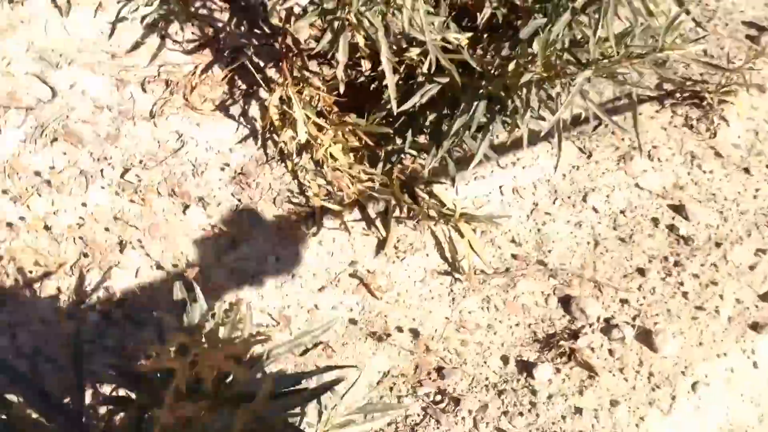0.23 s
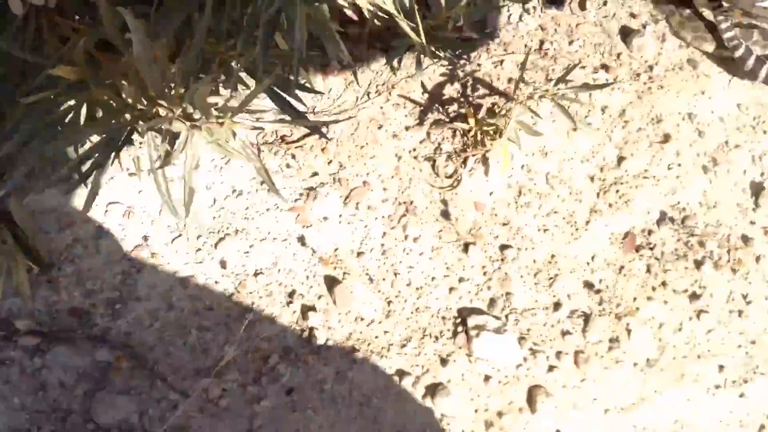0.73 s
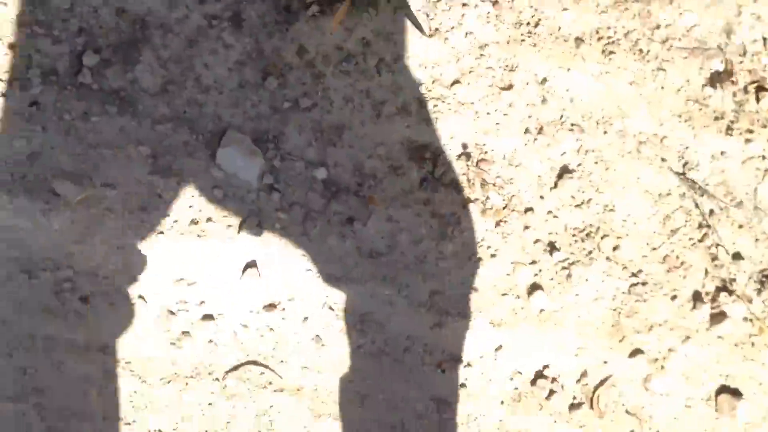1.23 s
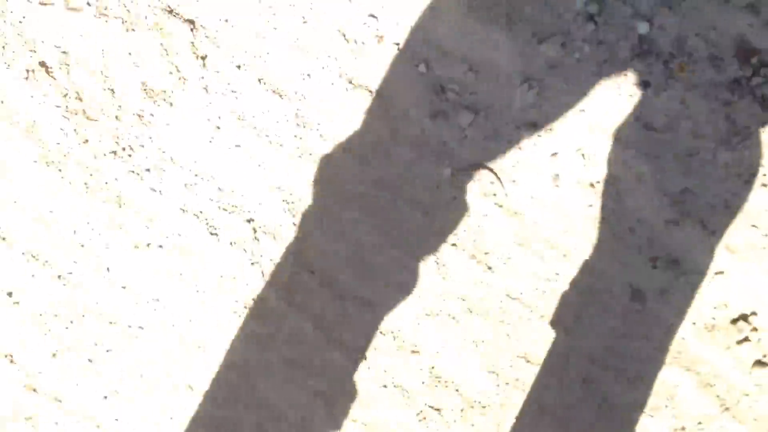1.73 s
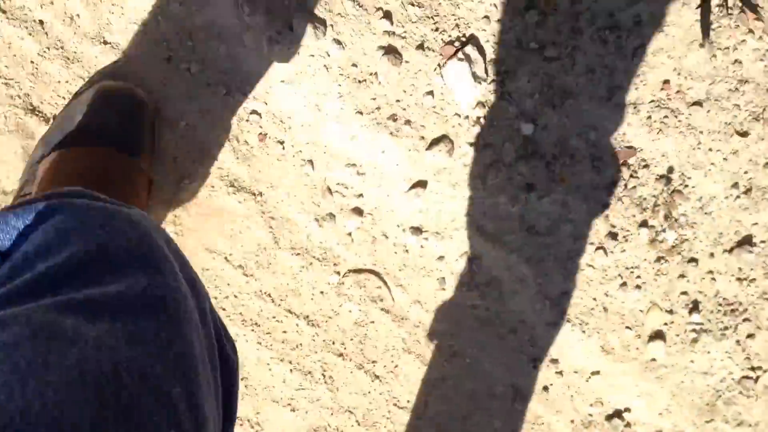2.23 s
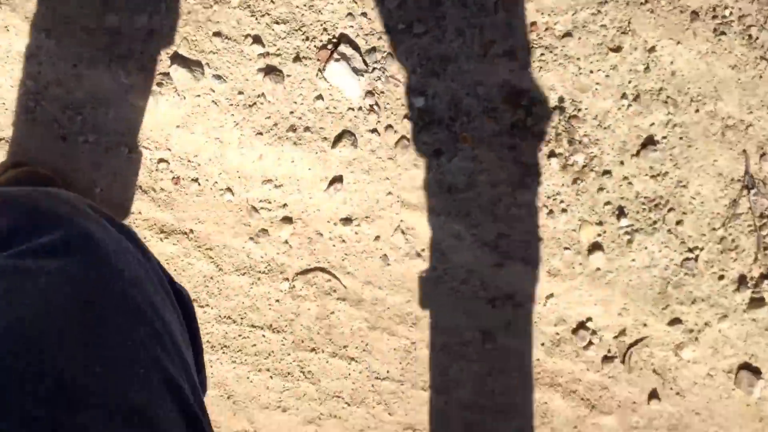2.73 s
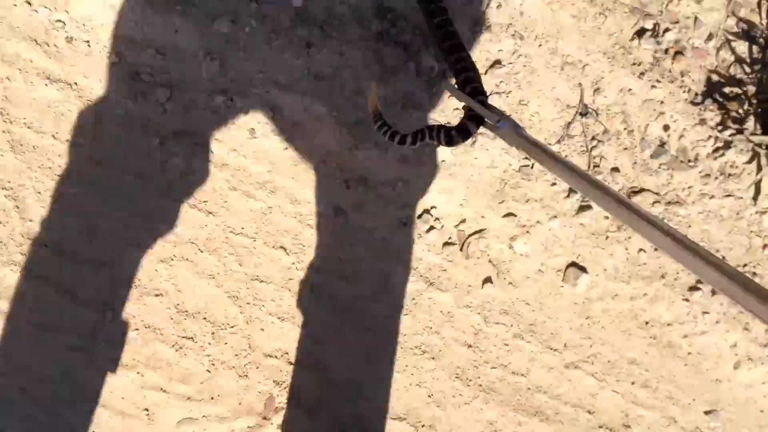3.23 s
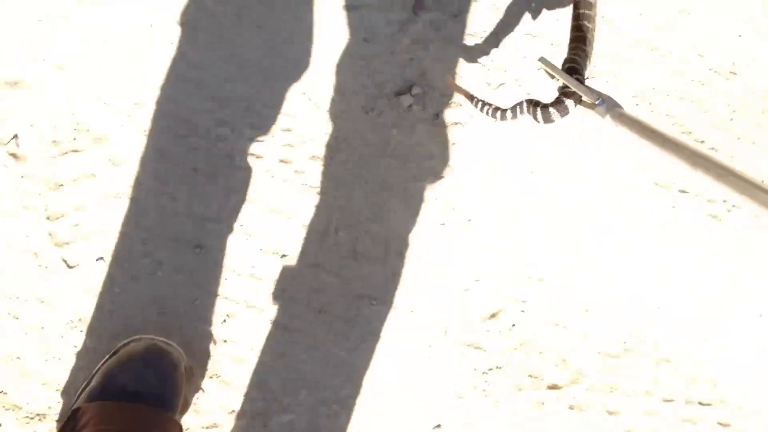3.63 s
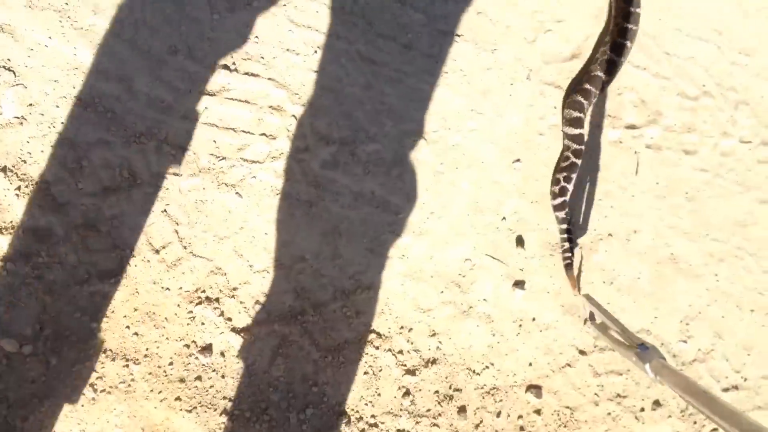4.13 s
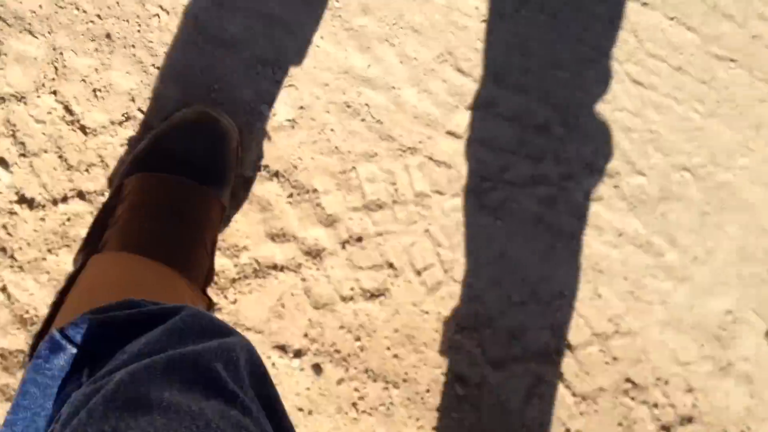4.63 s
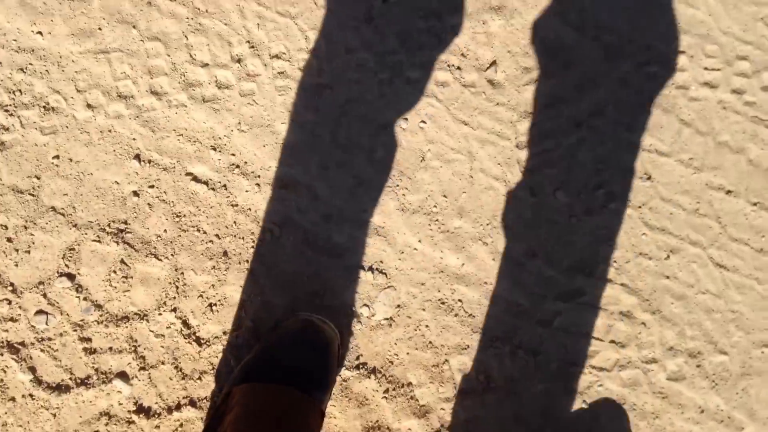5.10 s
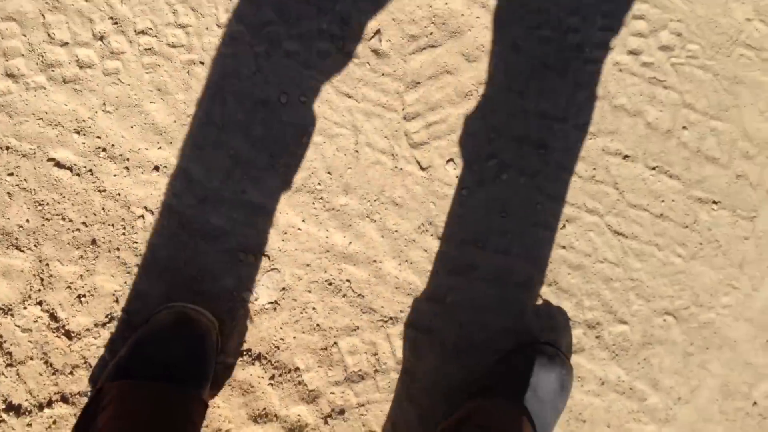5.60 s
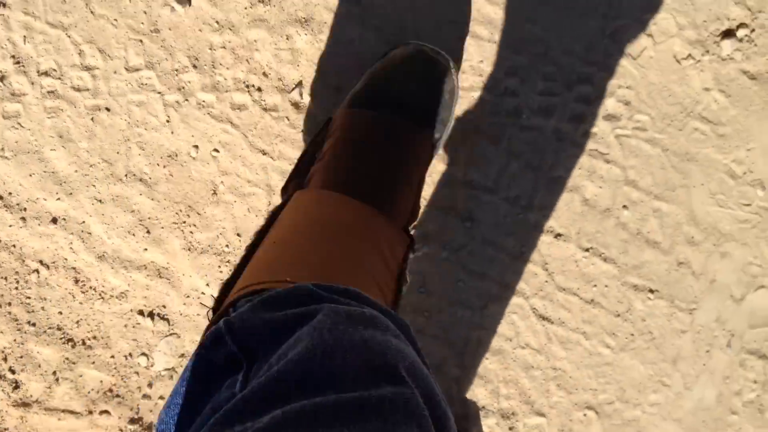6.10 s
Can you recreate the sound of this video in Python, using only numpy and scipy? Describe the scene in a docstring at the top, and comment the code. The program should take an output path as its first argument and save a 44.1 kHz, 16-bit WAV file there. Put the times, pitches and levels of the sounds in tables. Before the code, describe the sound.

A rattlesnake's dry rattle sputters in fits amid sharp clacks and scrapes, then settles into a loud steady buzz as boots crunch on dirt.

```python
"""A rattlesnake's tail thrashes in fits, clacking on twigs and tongs, then settles into a steady dry buzz.
Rattle: noise bursts and segment clicks at each turn of the tail, through a horn spectrum and a road echo.
Metal tongs: rung cracks, stick-slip scrapes, gliding squeaks, hinge creaks, and jaws that snap and ring.
Boots on a dirt road: dull noise thuds, damped-sine pebbles and crunching grit, over faint open air."""
import sys
import numpy as np
from scipy import signal
from scipy.fft import rfft, irfft, next_fast_len
from scipy.io import wavfile
from scipy.ndimage import uniform_filter1d, map_coordinates

SR = 44100
rng = np.random.default_rng(int(sys.argv[2]) if len(sys.argv) > 2 else 0)


def transcribe(u):
    """Save the signal u as a 16-bit wav file named by the first command-line argument.

    u: samples, shape (n,) or (channels, n), limited to [-1, 1]; the rate is SR.
    q: integer samples, one column per channel.
    """
    v = np.clip(np.atleast_2d(u).T, -1, 1)
    q = np.round(v * 32767).astype(np.int16)
    wavfile.write(sys.argv[1], SR, q)


N = 280343

# Rattle
# overall effort of the tail: time_s, level_db
EFFORT = [(0, -38), (.35, -41), (.55, -35.5), (1.4, -36.5), (1.7, -33.5), (2.2, -33), (2.5, -34.3),
          (2.75, -32), (2.86, -30.3), (3.1, -31.3), (3.45, -31.2), (3.7, -31.3), (4.0, -30.5), (4.4, -28),
          (4.8, -32.5), (5.05, -33), (5.45, -31.5), (5.75, -33.5), (6.05, -35.5)]
# bouts of rattling between brief halts: start_s, end_s, accent_db
BOUTS = [(0, 0.052, 1.5), (0.096, 0.208, 0), (0.242, 0.335, 0.5), (0.364, 0.424, -4), (0.44, 0.567, 1.5),
         (0.607, 0.652, -0.5), (0.677, 1.056, 1), (1.07, 1.128, 1), (1.138, 1.28, 3), (1.309, 1.563, 0),
         (1.585, 1.688, -2.5), (1.704, 1.818, -1.5), (1.831, 1.99, 0.5), (2.028, 2.053, -1),
         (2.089, 2.17, 0.5), (2.192, 2.391, -0.5), (2.411, 2.726, 0), (2.75, 2.818, 0), (2.839, 4.057, 2),
         (4.073, 4.09, -3), (4.125, 4.135, 3), (4.213, 4.339, 0), (4.347, 4.878, -0.5), (4.892, 4.96, 2),
         (4.983, 5.02, -3.5), (5.02, 5.137, 1), (5.165, 5.258, 0.5), (5.276, 5.562, 0.5), (5.585, 5.9, 0.5),
         (5.9, 6.011, 0.5), (6.043, 6.118, 1.5), (6.139, 6.235, 3.3), (6.265, 6.307, 1), (6.33, 6.36, 8.5)]
ATTACK_S, RELEASE_S = .006, .02  # linear rise; decay time constant
# thrashing (0) to steady buzz (1): time_s, steadiness_0_1
STEADINESS = [(0, 0.07), (2.2, 0), (2.9, 0.64), (4.4, 0.73), (5.7, 0.75), (6.3, 0.46)]
# tail speed, two turns to a cycle: time_s, turns_per_s
TAIL_SPEED = [(2.8, 160.5), (3.0, 160.1), (3.4, 153), (3.9, 149.7), (4.12, 161.1), (4.25, 154.9),
              (4.7, 158.8), (5.1, 156.9), (5.3, 155.5), (5.53, 165.7), (5.79, 154.7), (5.95, 171.5)]
SPEED_DRIFT = .008  # random share of the speed
IN_STEP_SHARE = 0.55  # power share of clicks on the turns, in a fully steady buzz
CLUMPS_THRASHING, CLUMPS_BUZZING = 0.72, 0.12  # power share of jostling in coarse clumps
FLICKS_PER_S, FLICK_DB, FLUTTER_DB = 40, 1.12, 0.8  # level unevenness: rate, thrashing depth, buzzing depth
CLICK_HZ, CLICK_SPREAD, CLICK_LIFE_S = 6270, 0.4, 0.00037  # typical pitch, log scatter, time constant
CHAIN_S, TURN_SPREAD_DB = .00065, 1  # timing scatter along the segments; extra scatter of click strength
# hollow horn segments: freq_hz, density_db_per_hz
HORN = [(300, -32), (710, -31.5), (1200, -30.5), (1450, -18.5), (1580, -17.5), (1900, -13), (2450, -10.3),
        (2940, -5), (4460, -2), (5290, -0.5), (8110, -2.5), (10800, -13), (12600, -14.5), (14600, -11.5),
        (15400, -12)]
# strongest band, wandering as the rattle turns: time_s, centre_hz, lift_db, width_octaves
FOCUS = [(0, 5050, 3, 0.27), (.46, 5900, 2.5, 0.25), (.53, 4720, 8.5, 0.29), (.62, 5960, 2.5, 0.33),
         (1.25, 4830, 2.5, 0.36), (1.47, 6260, 7.5, 0.35), (1.68, 4380, 2.5, 0.23), (2.22, 6240, 4.5, 0.24),
         (2.5, 7600, 1.5, 0.36), (2.9, 6450, 5.5, 0.49), (2.96, 6300, 3.5, 0.38), (3.0, 4250, 7, 0.2),
         (3.17, 4770, 2, .25), (3.37, 5800, 4, 0.19), (3.45, 5460, 4.5, 0.17), (3.51, 4870, 10, 0.1),
         (3.6, 5050, 4, 0.18), (3.67, 4450, 7, .1), (3.77, 5530, 6.5, .1), (3.85, 6060, 2, 0.2),
         (3.91, 5600, 11.5, 0.2), (3.97, 4680, 7, 0.32), (4.02, 3700, 5, .3), (4.14, 5923, 2, 0.27),
         (4.27, 4000, 3.5, .25), (4.38, 6400, 1.5, 0.1), (4.62, 6700, 2.5, 0.16), (4.8, 7500, 5, 0.15),
         (4.95, 7235, 0, 0.15), (5.05, 5200, 4.5, 0.24), (5.2, 6600, 1.5, 0.13), (5.38, 6270, 0, 0.16),
         (5.5, 4950, 4.5, .1), (5.59, 5000, 8.5, 0.097), (5.68, 4450, 12.5, 0.26), (5.76, 5330, 5, .17),
         (5.84, 5550, 9.5, 0.16), (5.97, 6300, 1.5, 0.11), (6.05, 5196, 1, 0.46)]
# treble lift, in full from 11.5 kHz up: time_s, lift_db
SHEEN = [(0, 7), (.42, 8), (.7, 4), (1.2, 2), (1.45, 10), (1.75, -0.5), (2.0, 7.5), (2.22, 1), (2.42, 7),
         (2.78, 10.5), (3.0, 7), (3.45, 8), (3.75, 4), (3.98, 0.5), (4.2, -1), (4.42, 2), (4.75, -3),
         (5.1, 1), (5.6, -1.5), (5.9, 5), (6.1, 1)]
BODY_THRASHING_DB, BODY_BUZZING_DB = 4, -1.5  # hollow low end; 0.7 of it is applied below 2.5 kHz
# echo off the road: time_s, extra_path_m, strength_0_1
ECHO = [(3.26, 0.23, 0), (3.35, 0.25, .3), (3.45, 0.24, .4), (3.5, .21, 0.3), (3.6, 0.23, 0.19),
        (3.64, 0.19, 0.2), (3.68, .15, 0.1), (3.78, 0.13, 0.4), (3.87, 0.077, 0.38), (4.0, 0.11, 0.08),
        (4.38, 0.098, 0.27), (5.3, 0.14, 0), (5.62, .14, 0), (5.83, .12, 0.07), (6.1, 0.094, 0.08)]
SOUND_M_PER_S = 343

# Clacks and tongs
# rattle, twigs and tongs knocking together: start_s, peak_db, ring_hz, t60_s
CLACKS = [(0.0506, -21.5, 3830, 0.023), (0.1953, -22, 3860, 0.023), (0.349, -20, 6250, 0.015),
          (0.393, -23, 3980, 0.016), (0.427, -24, 12100, 0.016), (.568, -24, 6040, 0.013),
          (.61, -21, 5970, 0.033), (0.6427, -9, 6600, 0.01), (0.7833, -7.5, 4420, 0.019),
          (.862, -13, 6050, 0.01), (0.9039, -12, 4740, .009), (0.9252, -7, 5300, 0.028),
          (.942, -17, 5500, 0.015), (0.999, -26, 3870, .012), (1.032, -11.5, 3700, 0.036),
          (1.032, -10, 3820, 0.011), (1.1041, -14.5, 4700, 0.04), (1.273, -12.5, 4410, 0.015),
          (1.288, -21, 4800, 0.011), (1.3485, -15, 4900, 0.02), (1.355, -12.5, 6300, 0.041),
          (1.4414, -20, 6500, 0.028), (1.451, -15, 6900, 0.039), (1.637, -15, 3730, 0.013),
          (1.6637, -21, 4530, 0.026), (1.8393, -18, 4060, 0.023), (2.164, -27, 3400, .02),
          (2.2026, -26, 4830, .025), (2.299, -22, 4000, .02), (2.4285, -26.5, 7100, .02),
          (2.63, -19, 7450, 0.027), (2.642, -15.5, 7600, 0.045), (2.809, -18, 6500, 0.013),
          (2.932, -17, 6960, 0.0067), (4.0808, -20.5, 4700, .025), (4.107, -11, 4680, 0.038),
          (4.1795, -19, 5640, .025), (4.9348, -24, 7340, 0.0099), (4.9414, -23, 7400, .009),
          (5.119, -16.5, 3860, 0.039), (5.1874, -20, 6800, .012), (6.1669, -25, 4210, .02),
          (6.2643, -15, 5000, 0.032)]
# crack of a clack: freq_hz, density_db_per_hz
CLACK_COLOUR = [(200, -65), (900, -8.5), (2000, -3.5), (3800, 5.5), (7000, 7), (11000, -5.5), (15000, 1)]
CLACK_RISE_S = 0.00071
CLACK_RING, RING_FALL = 0.47, 0.94  # ring/crack ratio at CLICK_HZ; power law of its fall with pitch
# strokes of the tongs through brush: start_s, length_s, level_db
STROKES = [(0.71, 0.032, -32.5), (0.766, 0.022, -28.5), (0.782, 0.13, -36.5), (0.905, 0.046, -30.5),
           (1.106, 0.03, -39.5), (1.202, 0.057, -38), (1.26, 0.026, -33), (5.07, .012, -42),
           (5.323, .006, -41)]
# modes of the tongs' shaft: freq_hz, width_hz, level_db
SHAFT = [(1523, 150, 5.5), (2015, 145, 5.5), (2370, 310, -3.5), (3740, 410, 2)]
SLIPS_PER_S, SLIP_S = 430, 0.0029  # twigs catching: mean rate, decay time constant
# metal slides and squeals: start_s, length_s, level_db, first_hz, last_hz, roughness_0_1 (clipped)
SQUEAKS = [(0.843, 0.021, -18, 4420, 4620, 0.01), (0.861, 0.023, -29, 4610, 4600, 0),
           (1.207, 0.012, -32.5, 2560, 2410, 0.9), (1.213, 0.021, -42, 3680, 3660, .1),
           (1.241, 0.018, -30, 2320, 2300, 0.04), (1.25, .018, -34, 3720, 3680, .1),
           (1.273, .012, -37, 4450, 4480, .1), (4.258, 0.029, -27.5, 2406, 2260, 0.2),
           (4.281, 0.05, -33, 2200, 1970, 1.1), (4.296, 0.0155, -34, 1450, 1210, 0.4),
           (5.085, 0.032, -32, 3150, 2550, 0.8), (5.621, 0.019, -42, 1770, 1720, 0.25)]
RASP_HZ, OVERTONE_DB = 480, -17.5  # spread from uneven slips; octave above the tone
# creaks of the tongs' hinge: start_s, length_s, peak_db, ring_hz
CREAKS = [(1.2065, .006, -16, 3600), (1.216, .018, -23, 3650), (1.255, .011, -20.5, 3400)]
CREAK_SLIPS_PER_S, CREAK_FADE_DB_PER_S, CREAK_RING_S = 330, 350, 0.00062  # last: time to swell to a peak
# hollow taps on the gear: start_s, level_db, pitch_hz
TAPS = [(2.5694, -13.5, 650)]
TAP_CYCLES = 0.44  # cycles to fall to 1/e
# jaws snapping shut: start_s, blow_db, chatter_t60_s, ring_db, thump_db
SNAPS = [(4.316, -21.5, 0.063, -40.5, -29), (5.1163, -19.5, 0.053, -42, -26),
         (5.6395, -23.5, 0.061, -26, -19)]
# ringing modes of the jaws: freq_hz, level_db, t60_s
JAWS = [(912, 3.5, 0.072), (1076, -13, 0.054), (1482, 5, 0.079), (1625, -1, 0.051), (1870, -10, .05),
        (2060, -11, 0.07), (2630, -5, 0.097), (3480, -6, 0.078)]
# chatter of the closing jaws: freq_hz, density_db_per_hz
SNAP_COLOUR = [(60, -45), (170, -1.5), (450, 1), (900, 2.5), (2000, 11), (4000, 0), (9000, -32)]
SNAP_RISE_S, SEAT_S = 0.0016, 0.0021  # chatter build-up; delay from touch to seating
JAW_WAVER_RAD, THUMP_HZ = 0.62, 380  # random phase shake of the ring; thump of the handle

# Boots and background
# boots landing and scuffing: start_s, level_db, t60_s, thin_below_hz
STEPS = [(.002, -36, 0.26, 100), (.134, -44, 0.1, 100), (0.371, -43.5, 0.31, 70), (0.456, -38, 0.13, 50.5),
         (0.9, -39.5, 0.055, 60), (.78, -41, 0.11, 200), (1.113, -48, .12, 400), (1.352, -46.5, 0.17, 120),
         (1.444, -41, 0.35, 330), (1.87, -51, 0.21, 250), (1.939, -55, 0.14, 400),
         (2.162, -39.5, 0.21, 68.4), (2.28, -44, 0.15, 170), (2.351, -54, 0.12, 59.7),
         (2.9, -50.5, 0.097, 150), (3.208, -47.5, 0.23, 150), (3.306, -42, 0.2, 100),
         (3.336, -39, 0.25, 100), (3.48, -50, 0.074, 120), (3.631, -48, 0.16, 220), (3.7, -51, 0.11, 100),
         (3.74, -46.5, 0.39, 200), (3.788, -42.5, 0.22, 130), (4.596, -50.5, 0.35, 90),
         (4.66, -51, .12, 300), (4.793, -46.5, 0.081, 400), (4.915, -45.5, 0.078, 200),
         (5.313, -50.5, .25, 180), (6.177, -49, 0.47, 250), (6.329, -42, 0.13, 199.4)]
SOLE_DULL_HZ = 940  # thuds roll off above this
# sole on packed dirt: freq_hz, density_db_per_hz
DIRT = [(40, -12), (90, -13.5), (140, -2.5), (210, 0), (350, -3), (700, -8.5), (2000, 1), (6000, -26)]
# grit shifting under the feet: time_s, level_db
SHUFFLE = [(0, -75), (.35, -56), (.8, -50.5), (1.5, -45), (1.75, -54.5), (2.05, -69), (2.3, -47.5),
           (2.7, -53.5), (3.3, -62), (3.65, -65), (3.9, -45.5), (4.35, -72), (5.55, -54), (5.9, -57),
           (6.3, -52.5)]
SHIFTS_PER_S, SHIFT_DB = 14, 2  # uneven weight on the feet: rate, depth
CRUNCH_DB, CRUNCH_S = -10.5, 0.099  # grit re step; power time constant before and after it
# crunching grit: freq_hz, density_db_per_hz
GRIT_COLOUR = [(30, -38), (70, -28), (160, -5.5), (350, 1.5), (800, -2), (1500, -1), (3000, -4),
               (8000, -11)]
PEBBLE_DB, PEBBLE_HZ = -0.5, 564  # level re step; typical pitch
PEBBLE_SPREAD, PEBBLE_CYCLES = 0.496, 1.27  # log scatter of pitch; cycles to fall to 1/e
# hard knocks of boots and gear: start_s, level_db, t60_s, dull_above_hz, thin_below_hz
BUMPS = [(0.038, -25, 0.07, 1100, 100), (.045, -26.5, 0.032, 2200, 130), (0.0887, -34, 0.041, 2980, 200),
         (.393, -27, 0.035, 1290, 130), (.515, -49, .2, 170, 40), (0.931, -37, 0.14, 1320, 200),
         (0.953, -32, 0.042, 400, 200), (1.269, -34.5, 0.075, 1400, 550), (1.633, -29, 0.04, 1880, 453),
         (2.42, -49.5, 0.15, 130, 40), (3.847, -36.5, 0.02, 2200, 700), (6.342, -34, 0.11, 2200, 300)]
# open air: freq_hz, density_db_per_hz
AIR_COLOUR = [(25, -30), (70, -34), (180, -7), (400, 4), (1200, 3), (3000, -6.5), (15000, -22.5)]
AIR_DB = -61.7
LEAD_S = .01  # silence ahead of each blow
TOP_HZ = 15500


def rattle():
    """Loose horn segments click together at each turn of the tail and jostle in between."""
    t = np.arange(N) / SR
    steady = np.clip(curve(STEADINESS, t), 0, 1)
    rate = curve(TAIL_SPEED, t) * (1 + SPEED_DRIFT * wobble(6))
    turns = t[1:][np.diff(np.floor(np.cumsum(rate) / SR)) > 0]
    # thrashing clatters in clumps, buzzing blurs into a fine sizzle
    clatter = knocks(scattered(520), spread_db=4.0, life=0.0027, rise=0.00048)
    sizzle = knocks(scattered(3000), spread_db=0.5, life=0.00043, rise=.0001)
    loose = np.clip(np.interp(steady, [0, 1], [CLUMPS_THRASHING, CLUMPS_BUZZING]), 0, 1)
    jostle = np.sqrt(loose) * clatter + np.sqrt(1 - loose) * sizzle
    share = np.clip(IN_STEP_SHARE * steady, 0, 1)
    in_step = np.sqrt(share) * coloured(clicks(turns, count=6), HORN)
    between = np.sqrt(1 - share) * coloured(jostle, HORN)
    uneven_db = np.interp(steady, [0, 1], [FLICK_DB, FLUTTER_DB]) * wobble(FLICKS_PER_S)
    level = bouts(t) * amp(curve(EFFORT, t) + uneven_db)
    return grounded(turned(in_step + between), t) * level


def clicks(turns, count):
    """Each turn makes count segments click close together, each at its own pitch; rms 1."""
    draws = np.clip(rng.standard_normal((len(turns), 3, count, 1)), -2, 2)
    late, pitch, size = draws.swapaxes(0, 1)
    t = np.arange(128) / SR
    strength = amp(TURN_SPREAD_DB * size[:, :1] + 0.98 * size)
    hz = CLICK_HZ * np.exp(CLICK_SPREAD * pitch)
    rings = strength * np.sin(2 * np.pi * hz * t) * np.exp(-t / CLICK_LIFE_S)
    first = np.round((turns[:, None, None] + CHAIN_S * late) * SR).astype(int)
    at = np.clip(first + np.arange(len(t)), 0, N)
    return unit(np.bincount(at.ravel(), rings.ravel(), N + 1)[:N])


def turned(shell):
    """As the rattle turns, its strongest band, top and body change, and patches of pitch swell and fade."""
    hz, s, z = signal.stft(shell, SR, nperseg=256)
    centre_hz, lift_db, octaves = curve(FOCUS, s)
    body_db = np.interp(curve(STEADINESS, s), [0, 1], [BODY_THRASHING_DB, BODY_BUZZING_DB])
    focus = np.exp(-.5 * (np.log2((hz[:, None] + 1) / centre_hz) / octaves) ** 2)
    top = along([(7000, 0.19), (11500, 1.0)], hz)[:, None]
    body = along([(2500, 0.7), (4200, 0)], hz)[:, None]
    segments_db = 1.7 * patches(z.shape, size=(2, 14))
    gain_db = lift_db * focus + curve(SHEEN, s) * top + body_db * body + segments_db
    return unit(signal.istft(z * amp(gain_db), SR, nperseg=256)[1][:N])


def patches(shape, size):
    """A smooth random field of rms 1 over pitch and time."""
    field = rng.standard_normal(shape)
    for axis in (0, 1, 0, 1):
        field = uniform_filter1d(field, size[axis], axis)
    return unit(field)


def grounded(x, t):
    """Add the echo off the road; its changing delay sweeps ripples through the buzz."""
    path_m, strength = curve(ECHO, t)
    strength = np.clip(strength, 0, .9)
    echo = map_coordinates(x, [(t - path_m / SOUND_M_PER_S) * SR])
    return (x + strength * echo) / np.hypot(1, strength)


def bouts(t):
    """Each bout starts fast, holds, and dies away once the tail halts."""
    gain = np.zeros(N)
    for start, end, db in BOUTS:
        attack = np.clip((t - start) / ATTACK_S + .5, 0, 1)
        release = np.exp(-np.clip(t - end, 0, .5) / RELEASE_S)
        gain = np.maximum(gain, amp(db) * attack * release)
    return gain


def clacks():
    """A hard contact: a sharp crack with a short hollow ring."""
    out, t = np.zeros(N), np.arange(4096) / SR
    for s, db, ring_hz, t60 in CLACKS:
        crack = coloured(rng.standard_normal(len(t)), CLACK_COLOUR)
        hollow = unit(filtered(crack, lambda hz: resonance(hz, ring_hz, 470)))
        blow = amp(-60 * t / t60) * (1 - np.exp(-t / CLACK_RISE_S))
        clack = blow * (crack + CLACK_RING * (CLICK_HZ / ring_hz) ** RING_FALL * hollow)
        add(out, s, amp(db) * clack / np.abs(clack).max())
    return out


def scrape():
    """Twigs catch and slip along the hollow shaft of the tongs; each stroke swells and fades."""
    slips = knocks(scattered(SLIPS_PER_S), spread_db=1.0, life=SLIP_S, rise=0.00055)

    def shaft(hz):
        """Sum of the shaft's modes, alternating in sign."""
        return sum((-1) ** k * amp(db) * resonance(hz, c, w) for k, (c, w, db) in enumerate(SHAFT))

    pressure = np.zeros(N)
    for s, length, db in STROKES:
        u = np.linspace(0, 1, int(length * SR))
        add(pressure, s, amp(db) * 2 * np.sqrt(u * (1 - u)))
    return unit(filtered(slips, shaft)) * pressure


def squeaks():
    """Short gliding stick-slip tones; uneven slips spread each into a narrow rasp."""
    out = np.zeros(N)
    for s, length, db, first_hz, last_hz, rough in SQUEAKS:
        u = np.linspace(0, 1, int(length * SR))
        glide = 2 * np.pi * np.cumsum(first_hz + (last_hz - first_hz) * u) / SR
        noises = rng.standard_normal((2, 4096))
        slips = [unit(filtered(x, lambda hz: 1 / (1 + (hz / RASP_HZ) ** 4))[:len(u)]) for x in noises]
        rasp = slips[0] * np.sin(glide) + slips[1] * np.cos(glide)
        pure = np.sin(glide) + amp(OVERTONE_DB) * np.sin(2 * glide)
        share = np.clip(rough, 0, 1)
        tone = np.sqrt(2 * (1 - share)) * pure + np.sqrt(share) * rasp
        add(out, s, amp(db) * np.sin(np.pi * u ** 0.76) * tone)
    return out


def creaks():
    """The hinge sticks and slips; every slip pings the metal, weaker than the last."""
    out, t = np.zeros(N), np.arange(512) / SR
    ping = t / CREAK_RING_S * np.exp(1 - t / CREAK_RING_S)
    for s, length, db, hz in CREAKS:
        for age in np.arange(0, length, 1 / CREAK_SLIPS_PER_S):
            tone = np.sin(2 * np.pi * hz * rng.normal(1, 0.016) * t)
            add(out, s + age, amp(db - CREAK_FADE_DB_PER_S * age) * ping * tone)
    return out


def taps():
    """A hollow tap on the gear: one heavily damped push."""
    out = np.zeros(N)
    for s, db, hz in TAPS:
        add(out, s - LEAD_S, amp(db) * push(hz, TAP_CYCLES))
    return out


def snaps():
    """The sprung jaws close with a thump and a chattering blow, then ring briefly and unsteadily."""
    out, t = np.zeros(N), np.maximum(np.arange(SR // 4) / SR - LEAD_S, 0)
    seated = np.maximum(t - SEAT_S, 0)
    for s, blow_db, chatter_t60, ring_db, thump_db in SNAPS:
        blow = burst(t, chatter_t60, SNAP_RISE_S, lambda hz: amp(along(SNAP_COLOUR, hz)))
        ring = np.zeros(len(t))
        for hz, db, t60 in JAWS:
            waver = JAW_WAVER_RAD * map_coordinates(rng.standard_normal(128), [t * 250])
            decay = amp(db + rng.normal(0, 1) - 60 * seated / t60)
            ring += decay * np.sin(2 * np.pi * hz * seated + waver)
        ring *= 1 - np.exp(-seated / 0.00069)
        add(out, s - LEAD_S, amp(blow_db) * blow + amp(ring_db) * ring)
        add(out, s - LEAD_S, amp(thump_db) * push(THUMP_HZ, cycles=0.74))
    return out


def push(hz, cycles):
    """One dull push, its swing damped to 1/e in the given cycles."""
    t = np.maximum(np.arange(2048) / SR - LEAD_S, 0)
    swing = (t > 0) * np.cos(2 * np.pi * hz * t) * np.exp(-hz * t / cycles)
    return filtered(swing, lambda f: 1 / (1 + (f / 1500) ** 16) / np.hypot(1, (170 / (f + 1)) ** 3))


def steps():
    """Soles thud on packed dirt, and grit crunches as the weight rolls on and off."""
    out, t = np.zeros(N), np.arange(N) / SR
    grit_power = amp(curve(SHUFFLE, t) + SHIFT_DB * wobble(SHIFTS_PER_S)) ** 2
    for s, db, t60, thin_hz in STEPS:
        add(out, s - LEAD_S, amp(db) * thud(t60, SOLE_DULL_HZ, thin_hz))
        add(out, s, amp(db + PEBBLE_DB) * pebbles(t60, count=9))
        grit_power += amp(db + CRUNCH_DB) ** 2 * np.exp(-np.abs(t - s) / CRUNCH_S)
    grit = coloured(knocks(scattered(350), spread_db=1.5, life=0.0071, rise=.0003), GRIT_COLOUR)
    return out + np.sqrt(grit_power) * grit


def pebbles(t60, count):
    """Stones shift one by one under a sole, each a short dull knock, weaker as the weight settles."""
    out, t = np.zeros(SR // 2), np.arange(1024) / SR
    for k, (pitch, size) in enumerate(np.clip(rng.standard_normal((count, 2)), -1.5, 1.5)):
        age = ((k + rng.uniform()) / count) ** 1.5
        hz = PEBBLE_HZ * np.exp(PEBBLE_SPREAD * pitch)
        knock = np.sin(2 * np.pi * hz * t) * np.exp(-hz * t / PEBBLE_CYCLES)
        add(out, .3 * t60 * age, amp(3 * size - 11 * age) * knock)
    return out


def bumps():
    """Short hard knocks of boots and gear."""
    out = np.zeros(N)
    for s, db, t60, dull_hz, thin_hz in BUMPS:
        add(out, s - LEAD_S, amp(db) * thud(t60, dull_hz, thin_hz))
    return out


def thud(t60, dull_hz, thin_hz):
    """One dull, gritty contact; the longer it lasts, the slower it builds."""
    t = np.maximum(np.arange(SR // 3) / SR - LEAD_S, 0)

    def response(hz):
        """Dirt spectrum, rolled off above dull_hz and below thin_hz."""
        dull = np.hypot(1, (hz / dull_hz) ** 3)
        thin = np.hypot(1, (thin_hz / (hz + 1)) ** 2)
        return amp(along(DIRT, hz)) / dull / thin

    return burst(t, t60, 0.0033 * t60, response)


def air():
    """Still open air: steady coloured noise."""
    return amp(AIR_DB) * coloured(rng.standard_normal(N), AIR_COLOUR)


def burst(t, t60, rise, response):
    """A noise burst of contact that builds, dies away and takes the colour of what is struck."""
    contact = rng.standard_normal(len(t)) * amp(-60 * t / t60) * (1 - np.exp(-t / rise))
    return filtered(contact, lambda hz: unit(response(hz)))


def knocks(times, spread_db, life, rise):
    """Noise bursts of random size at the given times; life and rise are time constants in s; rms 1."""
    sizes = amp(spread_db * np.clip(rng.standard_normal(len(times)), -2, 2))
    power = np.bincount(np.clip(times * SR, 0, N).astype(int), sizes ** 2, N + 1)[:N]
    for span in (life, rise):
        power = signal.lfilter([1], [1, -np.exp(-2 / (span * SR))], power)
    return unit(np.sqrt(power) * rng.standard_normal(N))


def scattered(per_second):
    """Random moments at a mean rate."""
    return rng.uniform(0, N / SR, int(per_second * N / SR))


def wobble(rate):
    """A smooth random curve, rate knots a second."""
    knots = rng.standard_normal(int(N * rate / SR) + 4)
    return map_coordinates(knots, [np.arange(N) * rate / SR])


def resonance(hz, centre, width):
    """Response of one damped mode."""
    return 1j * hz * width / (centre ** 2 - hz ** 2 + 1j * hz * width)


def coloured(x, points):
    """x given a (Hz, dB) spectrum, at rms 1."""
    return unit(filtered(x, lambda hz: amp(along(points, hz))))


def filtered(x, response):
    """x times a response of frequency."""
    size = next_fast_len(len(x) + 4096)
    return irfft(rfft(x, size) * response(np.fft.rfftfreq(size, 1 / SR)), size)[:len(x)]


def along(points, hz):
    """(Hz, value) points read on a log axis."""
    f, v = np.transpose(points)
    return np.interp(np.log(hz + 1), np.log(f + 1), v)


def curve(rows, t):
    """Each column after the time, read at times t."""
    s, *cols = np.transpose(rows)
    return np.squeeze([np.interp(t, s, c) for c in cols])


def add(track, s, sound):
    """Mix a sound in at s seconds."""
    part = track[max(round(s * SR), 0):][:len(sound)]
    part += sound[:len(part)]


def amp(db):
    """Decibels to gain."""
    return 10 ** (np.asarray(db) / 20)


def unit(x):
    """Scale to rms 1."""
    return x / np.sqrt(np.mean(x ** 2) + 1e-20)


def scene():
    """Snake, tongs and boots in still open air."""
    snake = rattle() + clacks()
    tongs = scrape() + squeaks() + creaks() + taps() + snaps()
    boots = steps() + bumps()
    return (snake + tongs + boots + air())[None]


def record(dry):
    """A small microphone sheds the deep bass; nothing passes above the band limit."""
    highpass = signal.butter(N=2, Wn=125, btype="highpass", fs=SR, output="sos")
    thin = signal.sosfilt(highpass, dry)
    return np.array([filtered(x, lambda hz: hz < TOP_HZ) for x in thin])


dry = scene()
out = record(dry)
transcribe(out)
```